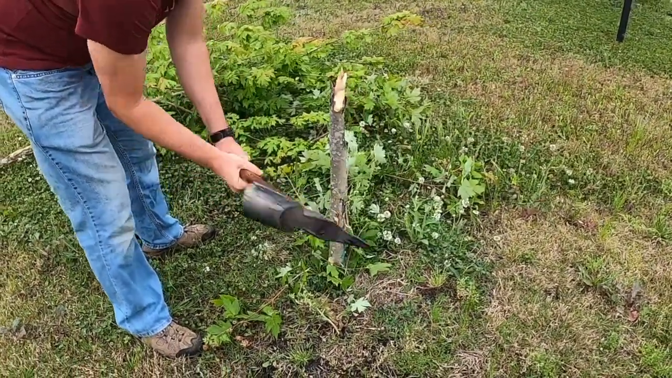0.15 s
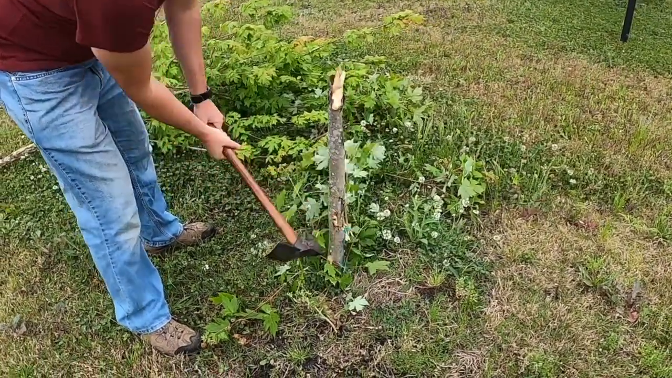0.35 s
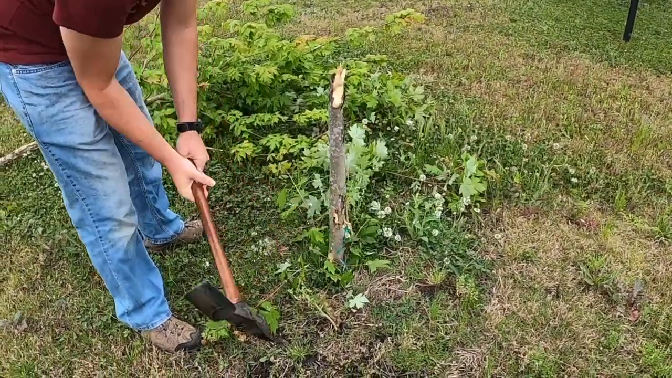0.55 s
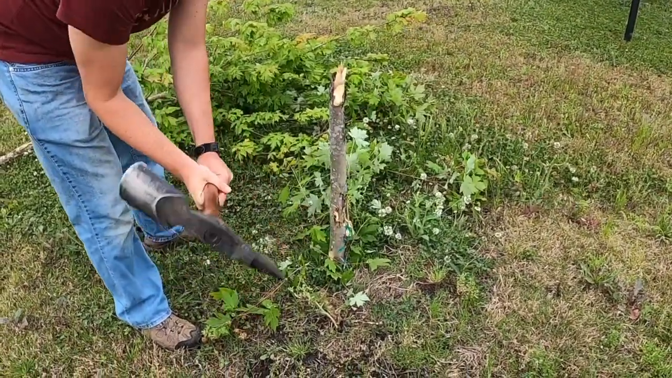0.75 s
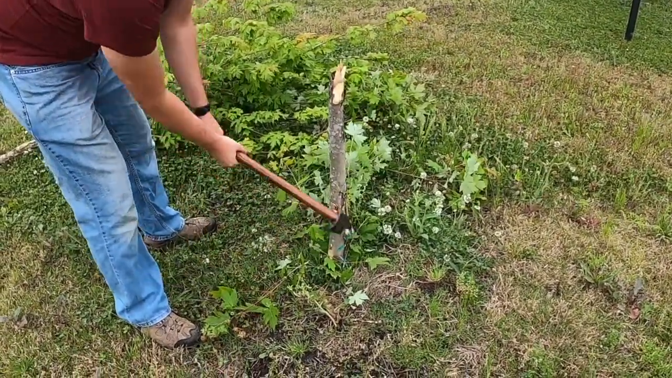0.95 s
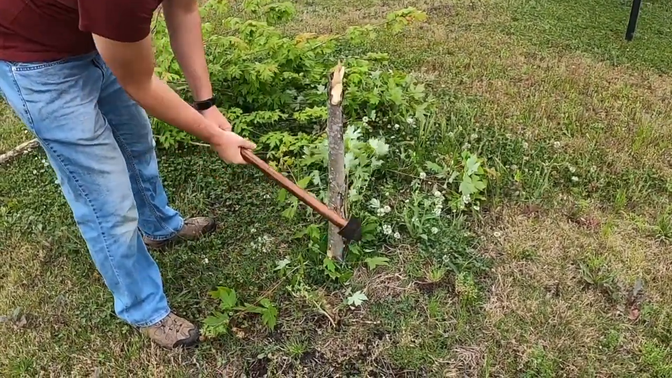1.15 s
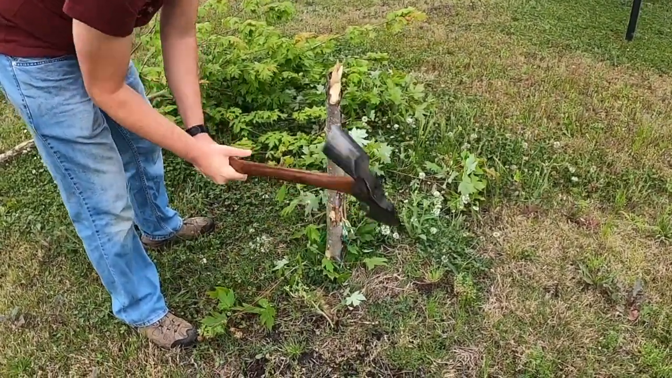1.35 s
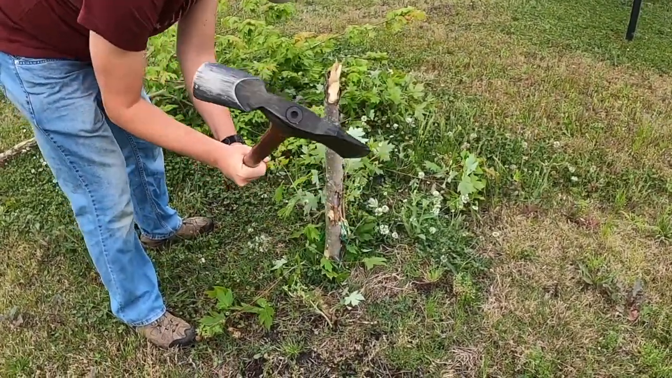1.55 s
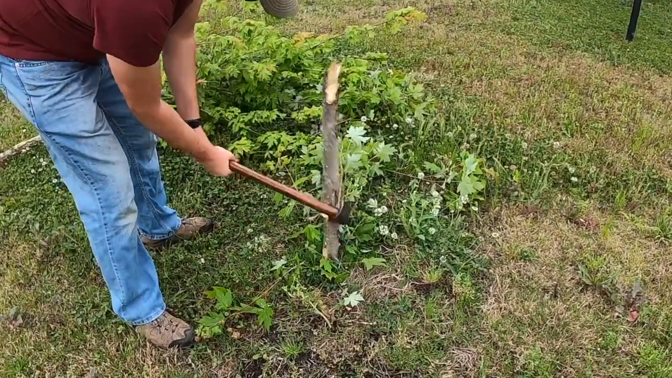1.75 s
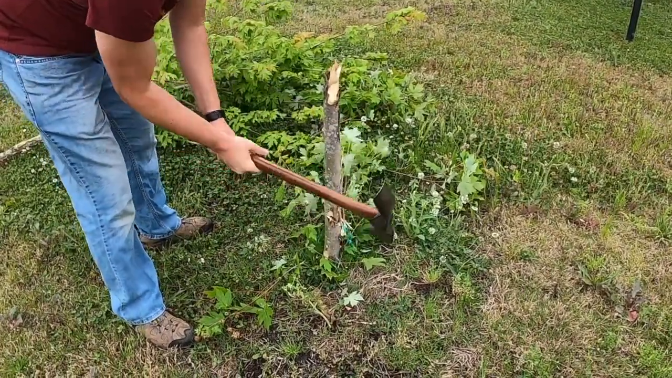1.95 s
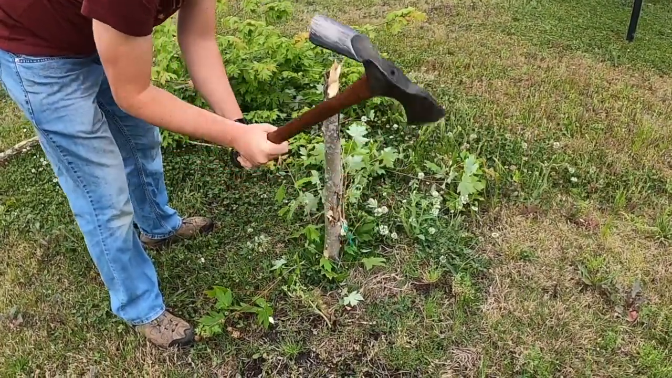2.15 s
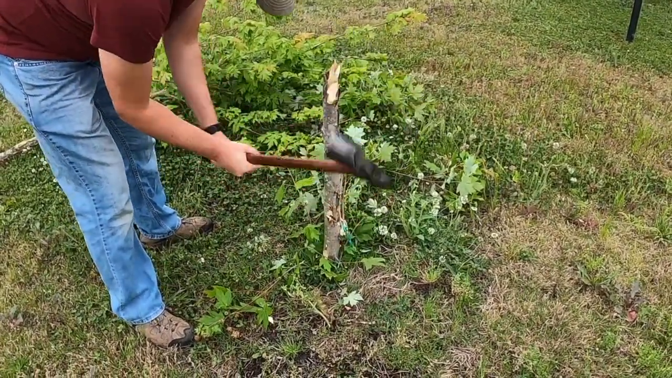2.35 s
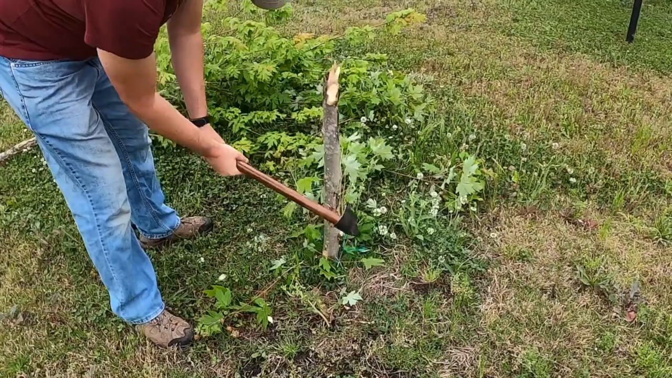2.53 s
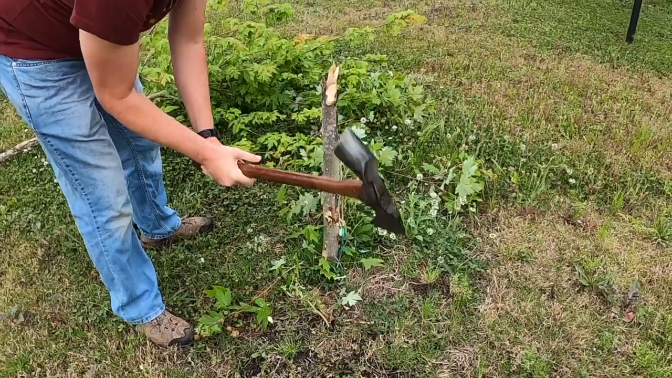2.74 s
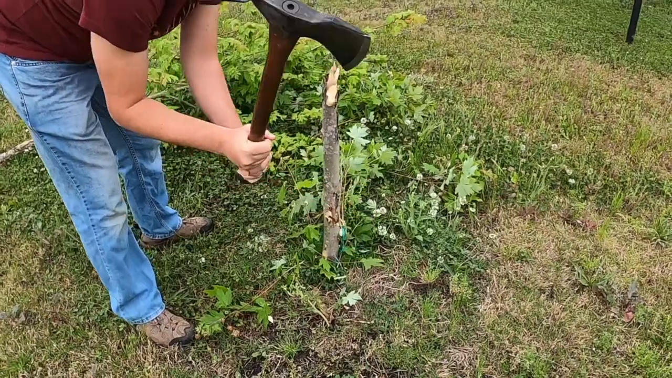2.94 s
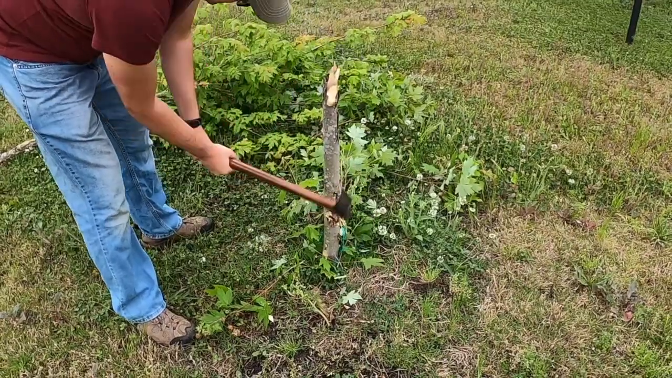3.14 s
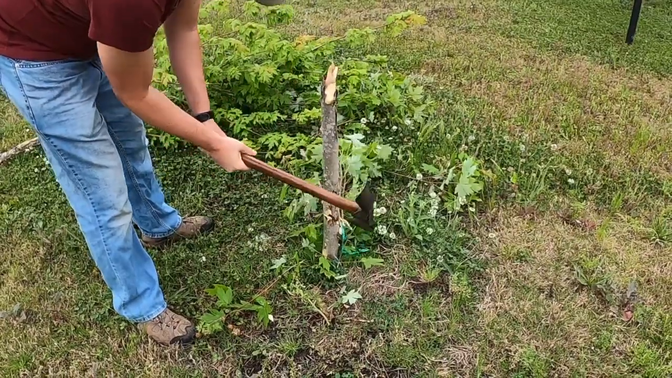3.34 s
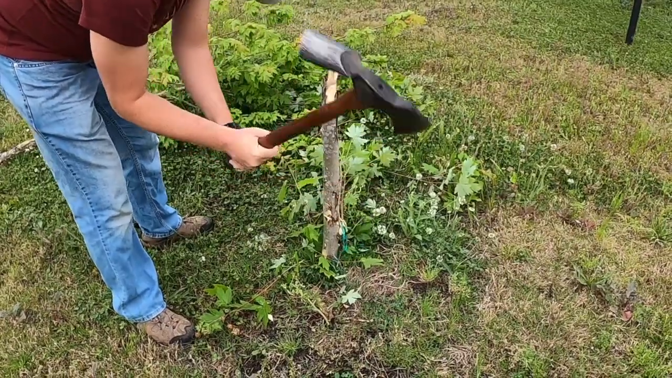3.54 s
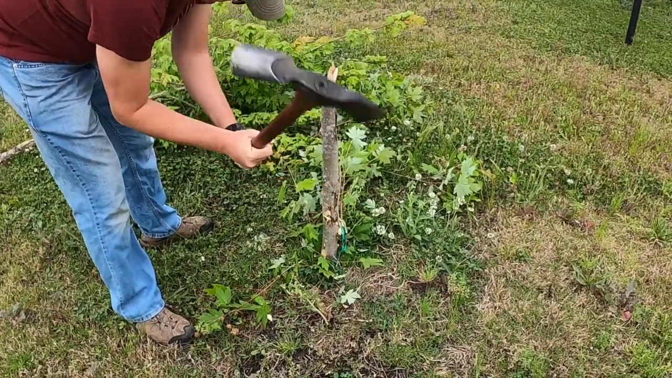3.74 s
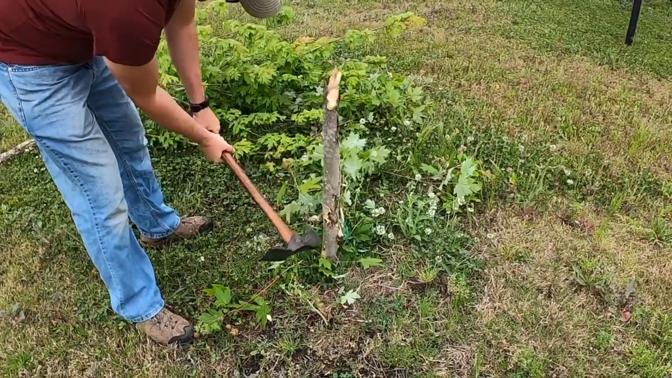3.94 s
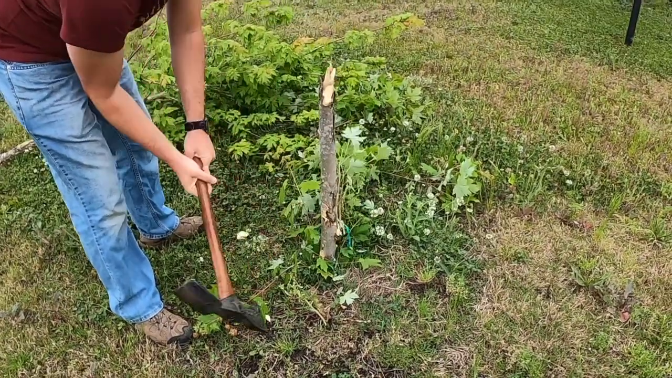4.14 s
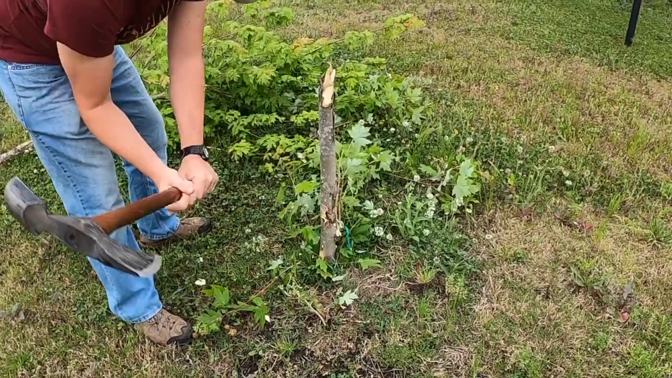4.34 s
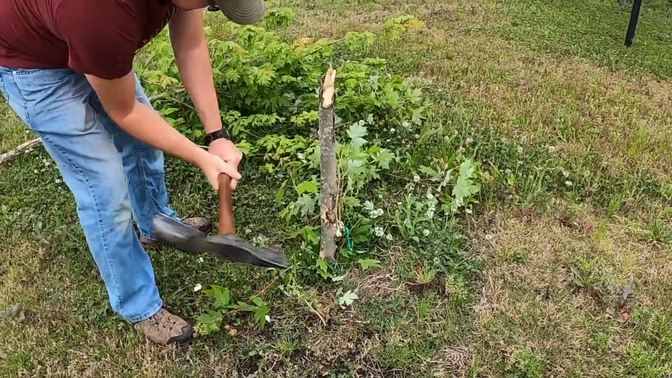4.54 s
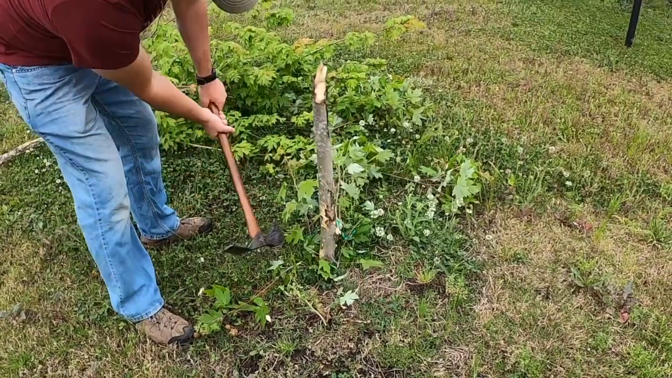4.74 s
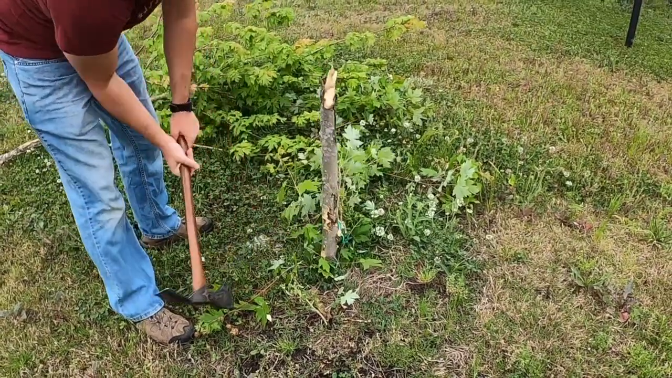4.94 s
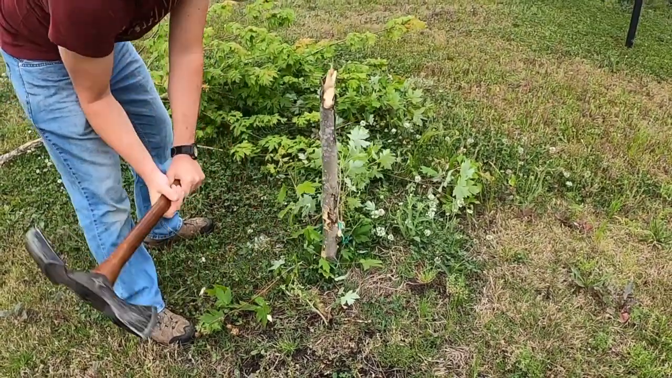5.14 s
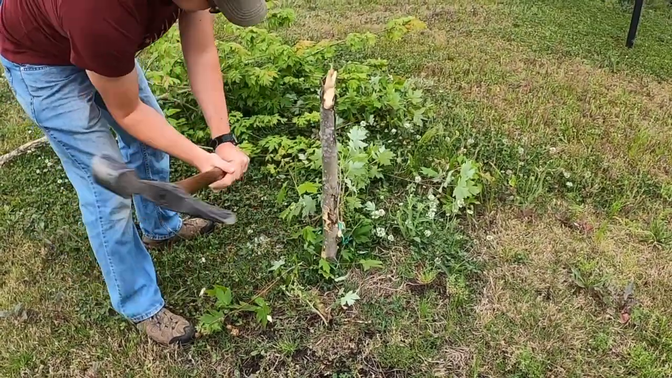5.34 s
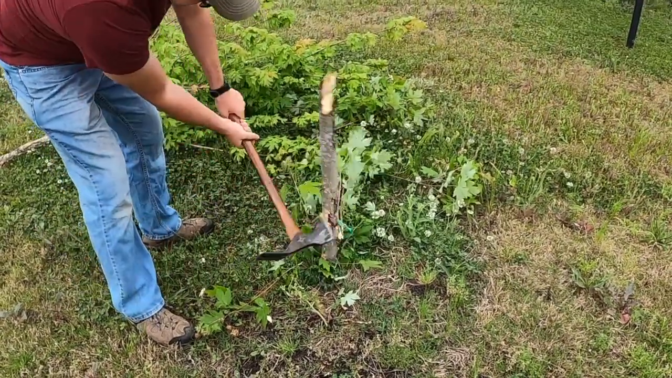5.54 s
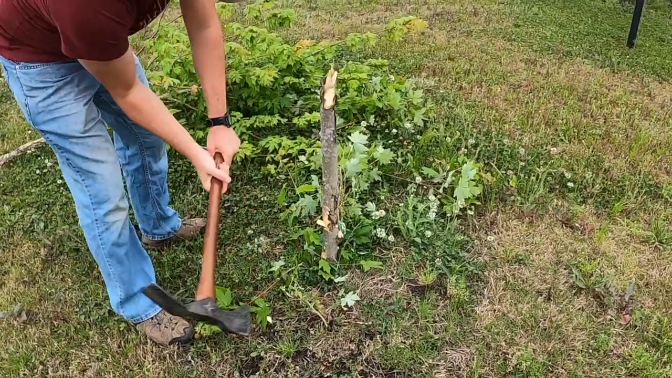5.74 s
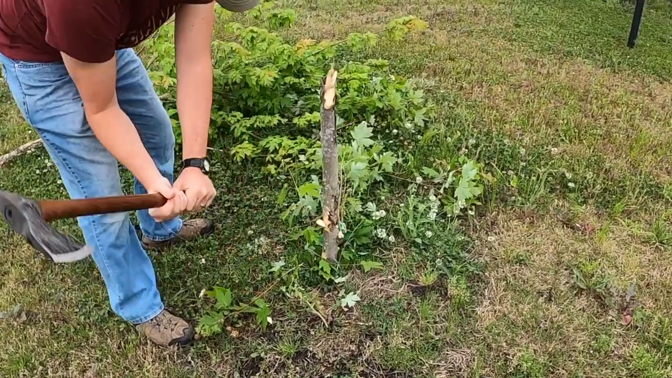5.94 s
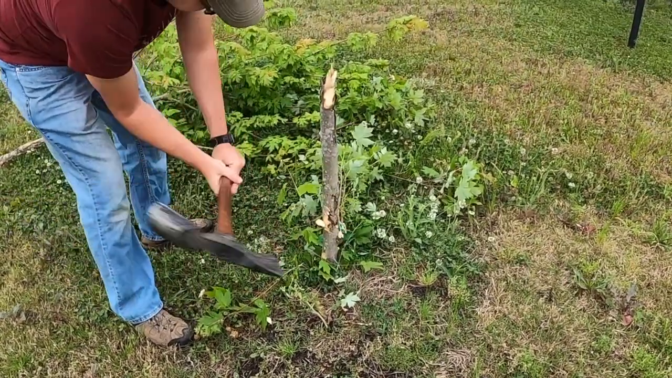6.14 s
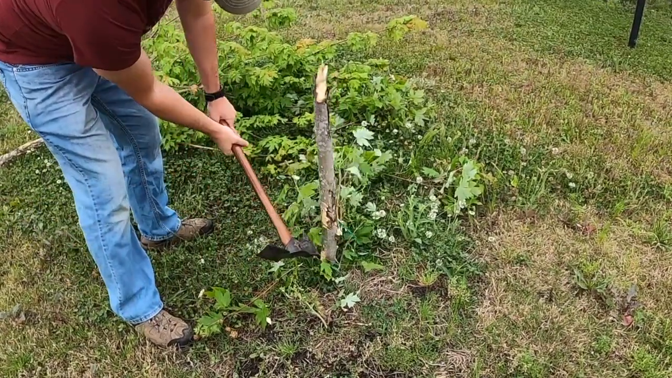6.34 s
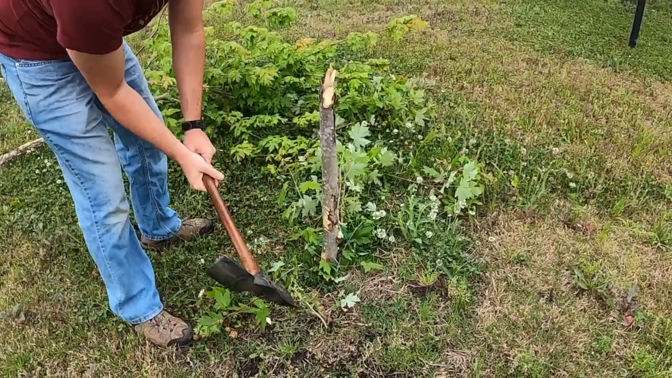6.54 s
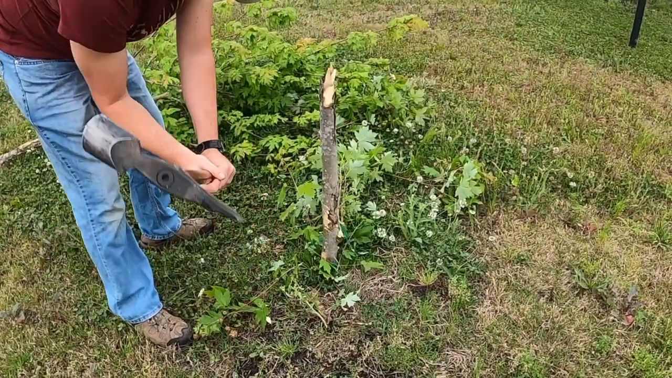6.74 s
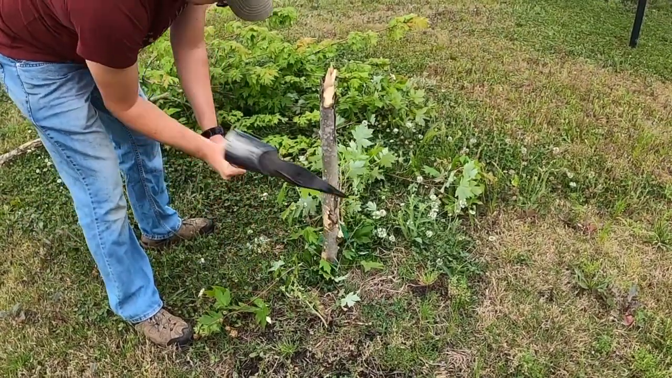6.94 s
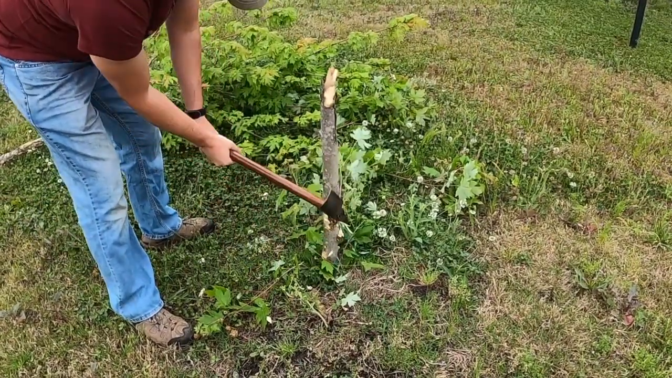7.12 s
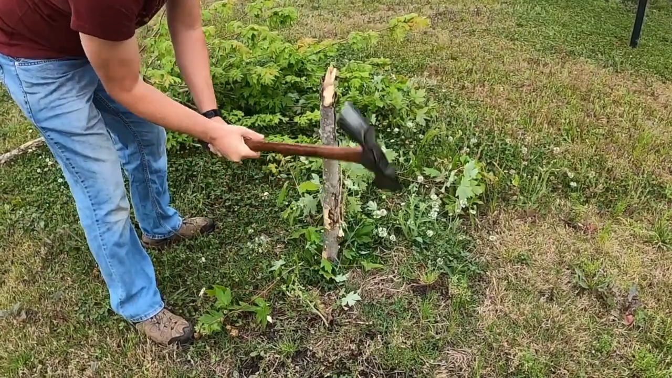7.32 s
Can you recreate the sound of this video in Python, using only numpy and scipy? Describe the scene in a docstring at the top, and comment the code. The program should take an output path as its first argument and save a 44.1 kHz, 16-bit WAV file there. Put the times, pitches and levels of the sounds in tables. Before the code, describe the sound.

Outdoors in an open yard, a close stereo microphone picks up soft far rumble and light wind. At 0.3 s an axe cracks into a thin green trunk: a sharp, dry woody snap, a short low thump from the rooted stem, dull soil knocks, tiny chips and a quick diffuse echo. Similar blows follow at about 1.05, 1.85, 2.5 and 3.25 s, with splinters snapping and shaken leaves rustling faintly. Wind grows gusty from 1.5 s, with bassy slaps near 2.3 and 3.3 s. The sixth blow, at 3.95 s, glances off with a faint gritty blade ring and extra crackles, amid buffeting around 4.1 s. Chops continue at 4.7, 5.55, 6.3 and 7.1 s, the 4.7 s one throwing more splinters. Especially heavy wind thuds hit near 5.2 and 6.65 s. Echo, leaves and wind linger after the last crack.

```python
"""Far rumble and wind start first, as filtered noise and grains; slaps of air hit the ports from 1.5 to 6.7 s.
From 0.33 to 7.1 s an axe chops ten times into a thin green trunk in an open yard, close to stereo ports.
Each blow is a grain volley through wood resonances, then a thump of decaying sines and dull root knocks;
splinters and chips snap as short volleys, the yard echoes in scattered grains and shaken leaves rustle on.
The sixth blow, at 3.95 s, glances off and leaves a gritty blade ring."""
import sys
import numpy as np
from scipy import signal
from scipy.io import wavfile
from scipy.ndimage import uniform_filter1d

SR = 44100
rng = np.random.default_rng(int(sys.argv[2]) if len(sys.argv) > 2 else 0)


def ratio_of_db(decibels):
    """Turn decibels (scalar or array-like) into linear amplitude factors; 0 dB maps to 1."""
    return 10 ** (np.asarray(decibels, float) / 20)


def pcm_store(signal):
    """Save signal as 16-bit PCM."""
    levels = np.round(np.clip(np.atleast_2d(signal), -1, 1) * 32767)
    wavfile.write(sys.argv[1], SR, levels.astype(np.int16).T)


N = 325458
TIME_S = np.arange(N) / SR
EDGES_HZ = 22 * 2 ** np.arange(0, 9.6, .5)


def rms_one(x):
    """Scale to rms 1."""
    return x / np.sqrt(np.mean(x ** 2) + 1e-20)


def at_hz(points, hz):
    """Read a spectrum on a log-frequency axis."""
    points = np.array(points)
    return np.interp(np.log(hz), np.log(points[:, 0]), points[:, 1])


def drift(rate_hz):
    """Slow chance with spread 1: low-passed noise, drawn at every 40th sample."""
    r = np.exp(-80 * np.pi * rate_hz / SR)
    white = rng.standard_normal(N // 40 + 2002)
    slow = signal.lfilter([1], [1, -2 * r, r * r], white)[2000:]
    return np.interp(np.arange(N) / 40, np.arange(len(slow)), rms_one(slow))


def resonate(x, hz, width_hz):
    """Two-pole resonance with gain 1 on top."""
    r = np.exp(-np.pi * width_hz / SR)
    poles = [1, -2 * r * np.cos(2 * np.pi * hz / SR), r * r]
    return signal.lfilter([(1 - r * r) / 2, 0, (r * r - 1) / 2], poles, x)


def bands(white, likeness):
    """Half-octave bands of stereo noise as (centre Hz, sound); neighbours alternate between the two streams."""
    for k, (low, high) in enumerate(zip(EDGES_HZ, EDGES_HZ[1:])):
        band_pass = signal.butter(2, [low, high], "band", fs=SR, output="sos")
        mid, side = signal.sosfilt(band_pass, white[k % 2])
        hz = np.sqrt(low * high)
        alike = np.clip(at_hz(likeness, hz), -1, 1)
        yield hz, np.sqrt(1 + alike) * mid + np.sqrt(1 - alike) * side * [[1], [-1]]


def grains(shape, share, spread_db):
    """Sparse clicks of random sign and very uneven size, scaled to rms 1."""
    sizes = ratio_of_db(spread_db * np.minimum(rng.exponential(1, shape), 4))
    signs = rng.choice([-1, 1], shape)
    return rms_one(sizes * signs * (rng.random(shape) < share))


def add(track, s, sound):
    """Mix a sound in at a time."""
    at = round(s * SR)
    track[..., at:at + sound.shape[-1]] += sound[..., :N - at]


# Far rumble and hiss. Each row: frequency in Hz, relative density in dB per Hz.
FAR_SPECTRUM = [(15, -33), (25, 2), (54, 0.5), (146, -9), (181, -24), (363, -58), (600, -41), (1210, -39),
                (2130, -49), (7480, -53), (10000, -74.5), (15000, -90)]
# Likeness of left and right. Each row: frequency in Hz, likeness (1 same, 0 unrelated).
FAR_LIKENESS = [(60, 1), (240, 0.38), (950, 0.3), (15000, 0.16)]
FAR_DB = -40.5


def far():
    """Distant rumble and air: noise wavering as a whole and band by band."""
    white, together_db = rng.standard_normal((2, 2, N)), 1.2 * drift(.8)
    noise = sum(ratio_of_db(at_hz(FAR_SPECTRUM, hz) + together_db + 1.8 * drift(5.0)) * band
                for hz, band in bands(white, FAR_LIKENESS))
    return ratio_of_db(FAR_DB) * rms_one(noise)


# Wind on each port. Each row: time in seconds, left level in dB, right level in dB.
WIND_GUSTS = [(0.0, -56, -50), (1.1, -37, -48.5), (1.451, -28, -31), (1.701, -35, -37.5),
              (2.1, -35.5, -40.5), (2.281, -22.5, -21.5), (2.45, -31.5, -36.5), (2.95, -43.5, -41),
              (3.1, -25, -30), (3.45, -32.5, -36), (3.9, -31.5, -31), (4.129, -18, -19), (4.4, -43, -43),
              (4.6, -26, -35), (4.901, -37, -36.5), (5.211, -19, -26.5), (5.45, -32.5, -28.5),
              (5.85, -47, -60), (6.451, -36.5, -38), (6.68, -23, -11.5), (6.92, -37, -33),
              (7.1, -21.5, -21.5), (7.37, -34.5, -34)]
# Wind colour in a strong gust. Each row: frequency in Hz, relative density in dB per Hz.
WIND_SPECTRUM = [(13, -32), (22, 5.5), (53, 9.5), (156, -3.5), (318, -25.5), (421, -34), (900, -60)]
STRONG_GUST_DB = -22


def wind():
    """Eddies hit each port as separate lumps of pressure, brighter the harder the gust."""
    s, left_db, right_db = np.transpose(WIND_GUSTS)
    gust_db = np.array([np.interp(TIME_S, s, left_db), np.interp(TIME_S, s, right_db)])
    eddies = grains((2, N), share=.012, spread_db=4.0)
    out = np.zeros((2, N))
    for hz, (left, right) in bands([eddies, -eddies], [(20, 0), (1000, 0)]):
        if hz < 900:
            ports = np.array([left + right, left - right])   # sum and difference: one eddy stream per port
            bright_db = .2 * (gust_db - STRONG_GUST_DB) * max(np.log2(hz / 60), 0)
            out += ports * ratio_of_db(at_hz(WIND_SPECTRUM, hz)) * ratio_of_db(bright_db)
    strength = np.sqrt(uniform_filter1d(out ** 2, size=9000) + 1e-12)   # the gust alone sets the loudness
    return ratio_of_db(gust_db) * out / strength


# Sudden slaps of wind. Each row: centre in seconds, left level in dB, right level in dB.
WIND_SLAPS = [(1.51, -29, -26), (2.171, -44, -23.5), (2.26, -24, -28.5), (2.318, -21.5, -13.5),
              (3.291, -8.5, -19.5), (4.07, -16.5, -36), (4.127, -12.5, -18.5), (4.18, -30, -24.5),
              (4.612, -29.5, -28), (5.195, -17, -12), (5.232, -6, -8.5), (6.644, -10, -11),
              (6.653, -17.5, -9.5)]
SLAP_HZ, SLAP_S, SLAP_REFERENCE_DB = 185.4, 0.00092, -11   # width SLAP_S holds at the reference level
WOBBLE_MEAN_HZ, WOBBLE_T60_S = 117.7, 0.1


def buffets():
    """A slap of air throws the diaphragm out and back, harder slaps sharper; the port air wobbles on."""
    out, age = np.zeros((2, N)), TIME_S[:5000] - .012
    fading = ratio_of_db(-60 * np.maximum(age, 0) / WOBBLE_T60_S) / (1 + np.exp(-age / 0.0027))
    chances = rng.normal(0, 1, (len(WIND_SLAPS), 3, 1))
    for (s, left_db, right_db), chance in zip(WIND_SLAPS, chances):
        sharpness = ratio_of_db(.25 * (max(left_db, right_db) - SLAP_REFERENCE_DB))
        slap = np.sin(2 * np.pi * SLAP_HZ * age) / np.cosh(age / SLAP_S * sharpness)
        wobble_hz = WOBBLE_MEAN_HZ * (1 + 0.32 * chance[1:])   # own pitch per port
        wobble = fading * np.sin(2 * np.pi * wobble_hz * age)
        level = np.sign(chance[0]) * ratio_of_db([[left_db], [right_db]])
        add(out, s + age[0], level * (slap + 0.53 * wobble))
    return out


# Axe blows. Each row: start in seconds, relative crack level in dB, crack t60 in seconds,
# brightness in dB per octave before a fixed lift, relative leaf shake in dB.
AXE_BLOWS = [(0.3315, -14, 0.029, 1.5, -57), (1.0501, -15.5, 0.039, 0, -48), (1.8422, -16, 0.045, 2.5, -48),
             (2.5037, -17, 0.057, 0.5, -62), (3.2420, -17, 0.067, 0.5, -60.5),
             (3.954, -16, 0.045, 1.5, -54.5), (4.7139, -18, 0.029, 0.5, -43),
             (5.565, -16.5, 0.022, 0.5, -54), (6.322, -14, .05, 1, -49), (7.121, -15, 0.027, 1.5, -71)]
# Echo colour. Each row: frequency in Hz, relative level in dB.
ECHO_SPECTRUM = [(200, 7), (450, -4.5), (800, -11.5), (2000, -3.5), (4000, -1.5), (7000, -9), (12000, -28)]
# Likeness of left and right in echo and leaves. Each row: frequency in Hz, likeness (clipped to -1..1).
YARD_LIKENESS = [(240, 1), (950, 0.89), (3770, 0.28), (15000, -1.07)]
AIR_LOSS_DB_PER_S_KHZ = 7
ECHO_RELATIVE_DB, ECHO_PEAK_S, ECHO_RISE_DB_PER_S, ECHO_SAG_DB_PER_S = -20, 0.044, 250.5, 67.5
FAR_WALL_S, BEYOND_EXTRA_DB_PER_S = 0.3, 152.5


def yard():
    """Walls, fences and bushes scatter each blow: builds up, sags, ends behind the far wall, loses treble."""
    age, out = TIME_S[:SR // 2], 0
    level_db = ECHO_RELATIVE_DB - ECHO_RISE_DB_PER_S * np.maximum(ECHO_PEAK_S - age, 0)
    level_db = level_db - ECHO_SAG_DB_PER_S * np.maximum(age - ECHO_PEAK_S, 0)
    level_db = level_db - BEYOND_EXTRA_DB_PER_S * np.maximum(age - FAR_WALL_S, 0)
    for hz, band in bands(grains((2, 2, N), share=.06, spread_db=1.5), YARD_LIKENESS):
        if hz > 150:
            power = np.zeros(N)
            air_db = AIR_LOSS_DB_PER_S_KHZ * age * hz / 1000
            fading = ratio_of_db(level_db + at_hz(ECHO_SPECTRUM, hz) - air_db) ** 2
            for s, crack_db, *_ in AXE_BLOWS:
                add(power, s, fading * ratio_of_db(crack_db) ** 2)
            out = out + np.sqrt(power) * ratio_of_db(3.8 * drift(70)) * band
    return out * ratio_of_db(1.3 * drift(110))


# Leaf rustle. Each row: frequency in Hz, relative density in dB per Hz.
LEAF_SPECTRUM = [(300, -27), (900, -7.5), (2200, 4), (4000, 7.5), (7000, -4), (12000, -23.5),
                 (15500, -57.5)]
LEAF_RISE_S, LEAF_T60_S = 0.13, 1.34


def leaves():
    """The shaken shoots whip back a moment after each blow and rustle on in clumps of tiny contacts."""
    shake = np.zeros(N)
    rise = np.minimum(TIME_S / LEAF_RISE_S, 1) ** 2
    for s, *_, shake_db in AXE_BLOWS:
        add(shake, s, rise * ratio_of_db(shake_db - 60 * TIME_S / LEAF_T60_S))
    white = grains((2, 2, N), share=.1, spread_db=3)
    rustle = sum(ratio_of_db(at_hz(LEAF_SPECTRUM, hz) + 3 * drift(60)) * band
                 for hz, band in bands(white, YARD_LIKENESS) if hz > 300)
    return rms_one(rustle) * shake * ratio_of_db(1.6 * drift(60))


def roots():
    """Stem and roots keep jolting in the soil for a moment: dull, lumpy knocks."""
    out, age = np.zeros(N), TIME_S[:SR // 2]
    for s, *_ in AXE_BLOWS:
        jolts = grains(len(age), share=.012, spread_db=3.5)
        jolts = jolts * np.minimum(age / 0.057, 1) * ratio_of_db(-60 * age / 0.42)
        add(out, s, resonate(jolts, 100, 97) + 0.39 * resonate(jolts, 220, 140))
        knocks = grains(len(age), share=.003, spread_db=2) * (age > .03) * ratio_of_db(-60 * age / .3)
        add(out, s, 0.11 * resonate(knocks, 440, 200))
    return ratio_of_db(-10.0) * signal.sosfilt(signal.butter(4, 680, fs=SR, output="sos"), out)


# Rooted stem swaying. Each row: mean frequency in Hz, relative signed swing height, t60 in seconds.
STEM_MODES = [(46, 0.21, 0.24), (68.4, 0.073, 0.54), (116, -0.44, 0.085), (231, 0.43, 0.076)]
PUSH_HZ = 91   # corner of the soft push
THUMP_LAG_S = .0028   # the stem gives way just after the edge bites


def thumps():
    """The blade's soft push sets the low modes of the stem swinging, a little differently each time."""
    out, age, r = np.zeros(N), TIME_S[:SR // 2], np.exp(-2 * np.pi * PUSH_HZ / SR)
    chances = rng.normal(0, 1, (len(AXE_BLOWS), 2, len(STEM_MODES)))
    for blow, chance in zip(AXE_BLOWS, chances):
        swing = np.zeros(len(age))
        for (hz, height, t60_s), a, b in zip(STEM_MODES, *chance):
            fading = height * ratio_of_db(0.32 * a - 60 * age / t60_s)
            swing += fading * np.sin(2 * np.pi * hz * (1 + 0.1 * b) * age)
        add(out, blow[0] + THUMP_LAG_S, signal.lfilter([1 - r], [1, -r], swing))
    return out


GLANCE_S, GLANCE_RELATIVE_DB, GLANCE_T60_S = 3.96, -43, .9
BLADE_HZ, BLADE_WIDTH_HZ = 4250, 500


def blade():
    """One blow glances off and the blade scrapes on: a gritty ring, with a weaker one an octave below."""
    out = np.zeros(N)
    grit = grains(SR, share=.05, spread_db=3) * ratio_of_db(3 * drift(40)[:SR])
    ring = resonate(grit, BLADE_HZ, BLADE_WIDTH_HZ)
    ring = ring + .5 * resonate(grit, BLADE_HZ / 2, BLADE_WIDTH_HZ / 2)
    add(out, GLANCE_S, ratio_of_db(GLANCE_RELATIVE_DB - 60 * TIME_S[:SR] / GLANCE_T60_S) * rms_one(ring))
    return out


CHIPS_PER_BLOW, CHIP_DELAY_S, CHIP_FALL_S = 20, .04, .27
CHIP_LOUDEST_RELATIVE_DB, CHIP_FADE_DB_PER_S, CHIP_SPREAD_DB = -36, 60, 7.7


def chips():
    """Snap rows for small chips pattering down: random moments and pitches, fainter the later they land."""
    rows = []
    chances = rng.random((len(AXE_BLOWS), CHIPS_PER_BLOW, 3))
    for blow, chance in zip(AXE_BLOWS, chances):
        for a, b, c in chance:
            fall_s = CHIP_FALL_S * a
            s = blow[0] + CHIP_DELAY_S + fall_s
            peak_db = CHIP_LOUDEST_RELATIVE_DB - CHIP_FADE_DB_PER_S * fall_s - CHIP_SPREAD_DB * b
            if s < N / SR:
                rows.append((s, peak_db, 1800 * 3.0 ** c, .35))
    return rows


# Split wood under the blade. Each row: frequency in Hz, width in Hz, relative mean level in dB.
WOOD_MODES = [(444, 110, -6), (1094, 210, -6), (2000, 950, -3), (3140, 580, -5), (4000, 1100, -6),
              (6200, 3900, -9.5), (10500, 5000, -23)]


def wood(tearing, tilt_db_per_octave):
    """The resonances of the split wood, struck with new strengths each time."""
    out = 0
    for k, (hz, width_hz, db) in enumerate(WOOD_MODES):
        strength_db = db + tilt_db_per_octave * np.log2(hz / 2000) + rng.normal(0, 2.3)
        gain = (-1) ** k * ratio_of_db(strength_db) * np.sqrt(500 / width_hz)
        out = out + gain * resonate(tearing, hz, width_hz)
    return out


# Splinters snapping and chips landing. Each row: start in seconds, relative peak in dB, pitch in Hz,
# width as share of pitch.
SPLINTERS = [(0.3563, -10, 2750, 1.5), (1.8605, -4, 4500, 0.33), (2.1135, -33, 5940, 1.4),
             (2.5193, -10.5, 4900, 0.89), (2.872, -51, 4000, 1.6), (2.905, -47, 2960, 1.5),
             (3.2598, -8, 3600, 1.5), (3.9555, -9, 1080, 0.11), (3.9715, -23, 4050, 0.21),
             (4.021, -22.5, 3870, 0.34), (4.0315, -17, 3950, 0.8), (4.161, -37, 4130, 0.092),
             (4.7197, -3.5, 4600, 0.34), (4.7462, -29, 4500, 0.71), (4.7658, -27.5, 4100, 0.26),
             (4.872, -31.5, 3490, 0.35), (4.911, -39, 4500, .8), (4.928, -29.5, 3430, 1.2),
             (4.979, -36.5, 1110, 0.069), (5.5998, -19.5, 2340, 0.83), (5.6258, -24.5, 5950, 2.6),
             (5.8454, -37, 2000, 0.89), (6.0816, -41.5, 2536, 2.2), (6.3724, -20, 3025, 0.87),
             (7.1612, -6.5, 1500, 8.6)]


def snaps():
    """Each splinter is a short volley around its own pitch; bigger ones tear longer; wide ones sound the wood."""
    out, age = np.zeros(N), TIME_S[:3000]
    for s, peak_db, hz, spread in SPLINTERS + chips():
        t60_s = .011 + .008 * ratio_of_db(peak_db)
        volley = grains(len(age), share=.3, spread_db=2.5) * ratio_of_db(-60 * age / t60_s)
        sound = resonate(resonate(volley, hz, spread * hz), hz, 2.0 * hz) / np.sqrt(spread)
        sound += .5 * spread * wood(volley, 0)
        add(out, s, ratio_of_db(peak_db) * sound / np.max(np.abs(sound)))
    return out


def cracks():
    """Fibres tear in a dense volley that dies fast; the first instant is the brightest."""
    out, age = np.zeros(N), TIME_S[:4000]
    for s, crack_db, t60_s, tilt_db, shake_db in AXE_BLOWS:
        tearing = grains(len(age), share=.25, spread_db=4.0) * np.minimum(age / .0015, 1)
        bright_fade = ratio_of_db(-60 * np.maximum(age - .002, 0) / (0.23 * t60_s))
        dull_fade = ratio_of_db(-60 * np.maximum(age - .005, 0) / t60_s)
        crack = wood(tearing * bright_fade, tilt_db + 1.0) + wood(tearing * dull_fade, tilt_db + 0.5)
        add(out, s, ratio_of_db(crack_db) * crack / np.std(crack[:300]))
    return out


LEFT_LAG_SAMPLES = 1.4   # at low pitch; the trunk stands a little to the right


def scene():
    """Trunk close by, its echo, leaves, wind and distance."""
    trunk = cracks() + snaps() + thumps() + roots() + blade()
    trunk = trunk * ratio_of_db([[.6], [-.6]])   # left, right in dB
    late = (1 - LEFT_LAG_SAMPLES) / (1 + LEFT_LAG_SAMPLES)
    trunk[0] = signal.lfilter([late, 1], [1, late], trunk[0])   # all-pass delay
    return trunk + yard() + leaves() + wind() + buffets() + far()


def top_cut(x):
    """Nothing passes above the cut-off."""
    return signal.sosfilt(signal.butter(12, 15980, fs=SR, output="sos"), x)


SHADE_HZ, SHADE_DB = 4500, -5   # the housing shades the left port
TOP_HZ = 14000   # the microphone's upper limit
LEAD_IN_S, LEAD_IN_DB, LEAD_IN_LOSS_DB = .0107, -27, 10


def record(dry):
    """Left treble is shaded, the top falls away, two faint mid-band copies run ahead, peaks are rounded."""
    shade_s = 1 / (2 * np.pi * SHADE_HZ)
    shelf = signal.bilinear([ratio_of_db(SHADE_DB) * shade_s, 1], [shade_s, 1], SR)
    top = signal.butter(4, TOP_HZ, fs=SR, output="sos")
    ports = signal.sosfilt(top, [signal.lfilter(*shelf, dry[0]), dry[1]])
    lead = round(LEAD_IN_S * SR)
    middle = signal.sosfilt(signal.butter(2, [600, 6000], "band", fs=SR, output="sos"), ports)
    middle = np.pad(middle, [(0, 0), (0, 2 * lead)])
    copies = middle[:, lead:lead + N] + ratio_of_db(-LEAD_IN_LOSS_DB) * middle[:, 2 * lead:]   # earlier one fainter
    ports = ports + ratio_of_db(LEAD_IN_DB) * copies
    return top_cut(2.0 * np.tanh(ports / 2.095))


dry = scene()
out = record(dry)
pcm_store(out)
```